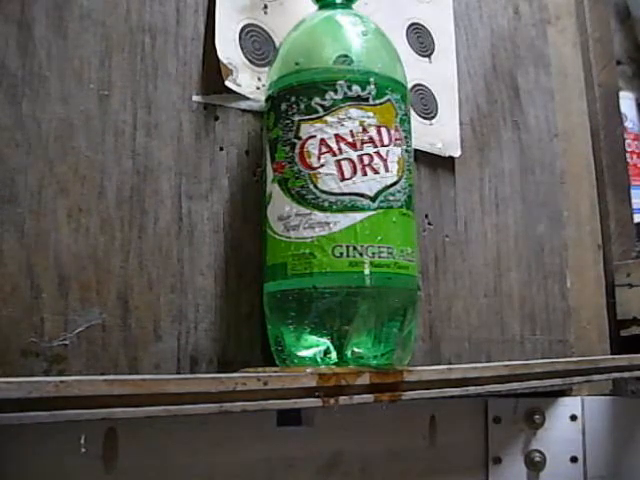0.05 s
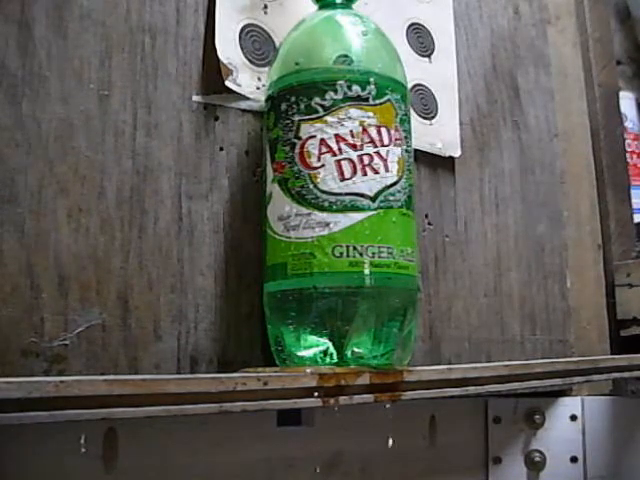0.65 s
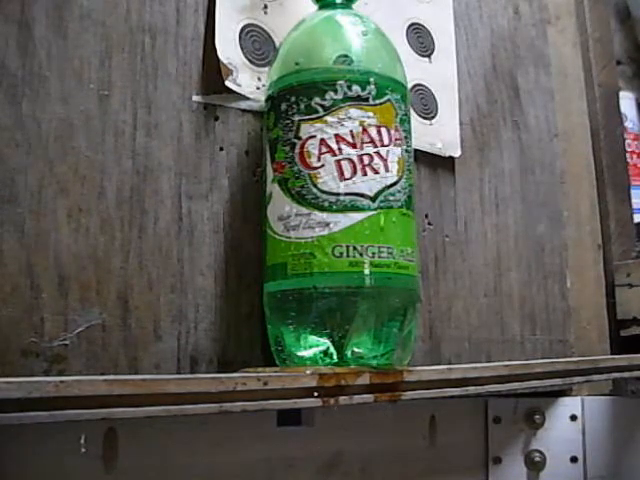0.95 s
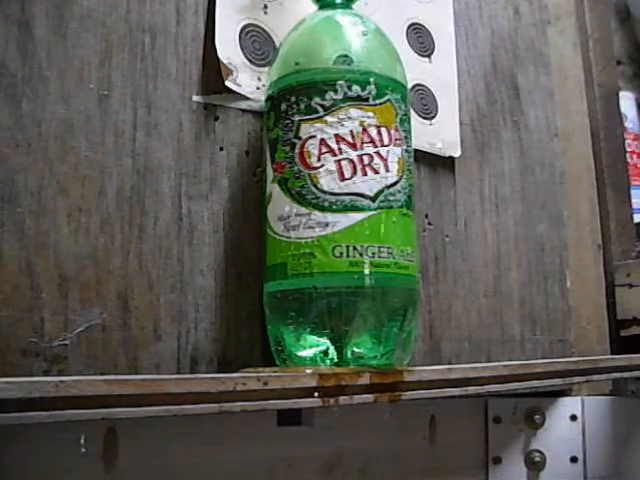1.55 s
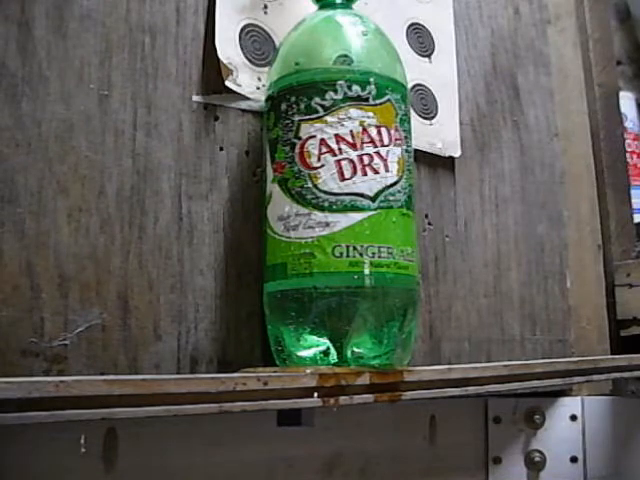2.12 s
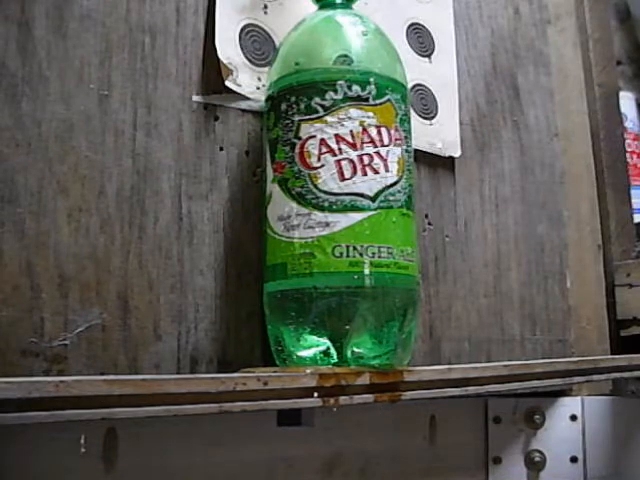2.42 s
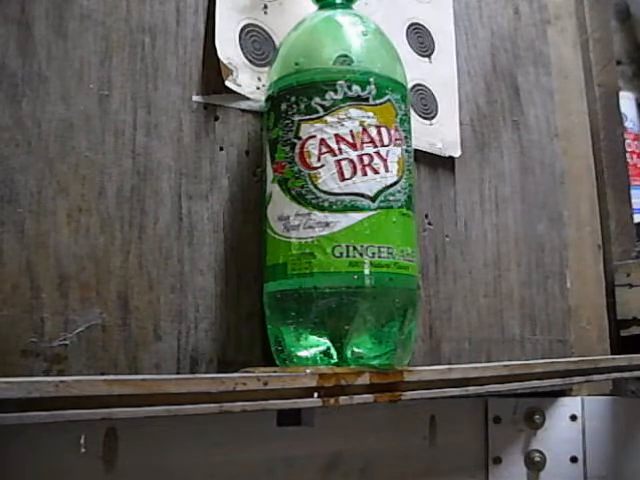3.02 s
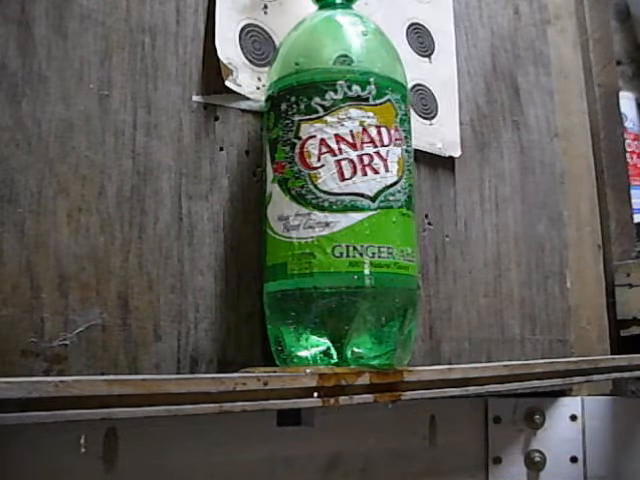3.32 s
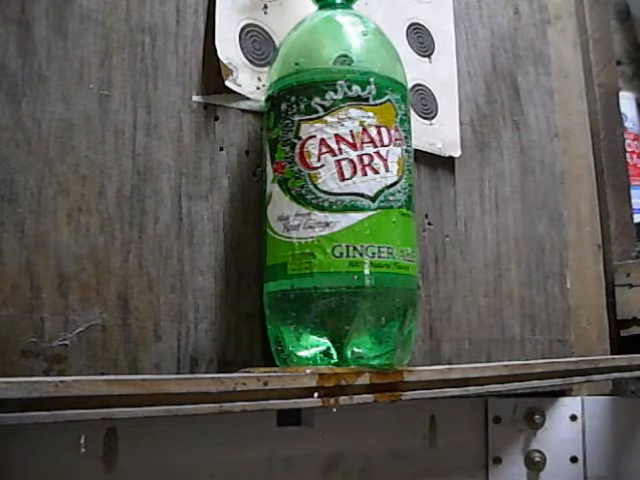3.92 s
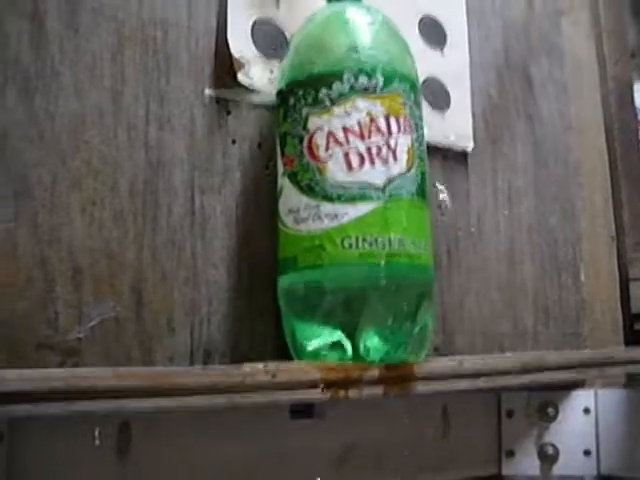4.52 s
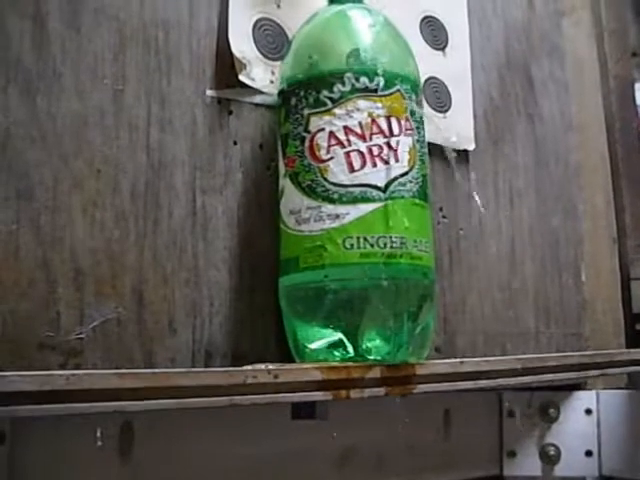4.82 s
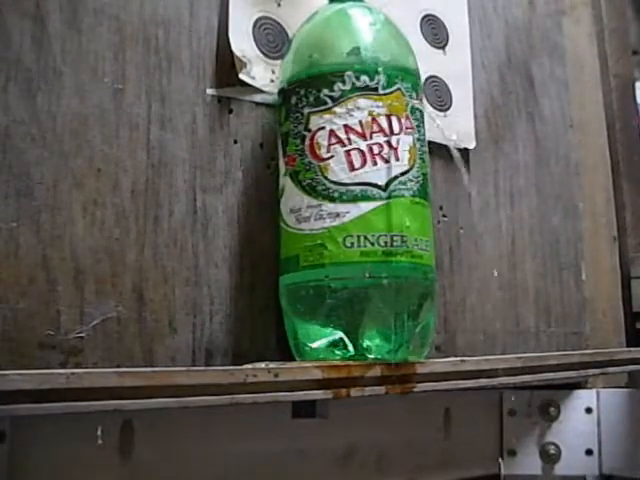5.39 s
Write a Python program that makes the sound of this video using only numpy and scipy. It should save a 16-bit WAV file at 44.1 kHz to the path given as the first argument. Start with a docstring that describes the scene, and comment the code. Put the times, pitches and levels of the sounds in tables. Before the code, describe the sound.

A sleeve brushes, a latch snaps and an air rifle's steel action clacks shut. A quiet wait follows, with irregular hollow drips, a dull bump, light clicks and a distant engine. Then one sharp shot strikes a filled plastic bottle, which knocks and rattles on its wooden shelf over a short low boom. Dripping carries on afterward. It is heard indoors through a small microphone with little treble that distorts at the peak.

```python
"""Air rifle and soda bottle

An air rifle is cocked and fired indoors at a plastic soda bottle that stands against plywood.
Each impact excites the damped modes of the object struck. The shot overloads a small narrow-band
microphone, and the bottle rocks and rattles on its shelf. Soda drips onto something hollow,
a dull bump sounds like a footfall, and an engine pulls through its gears far outside."""
import sys
import numpy as np
from scipy import signal
from scipy.fft import rfft, irfft
from scipy.io import wavfile

SR = 44100
rng = np.random.default_rng(int(sys.argv[2]) if len(sys.argv) > 2 else 0)


def int16_out(signal):
    """Quantize to a 16-bit WAV file."""
    q = np.round(np.clip(np.atleast_2d(signal).T, -1, 1) * 32767)
    wavfile.write(sys.argv[1], SR, q.astype(np.int16))


N = 244887
TIME, AGE = np.arange(N) / SR, np.arange(SR) / SR  # seconds into the scene; seconds after an impact
BASS_HZ, MIDDLE_HZ, TREBLE_HZ = (85, 400), (400, 1050), (1100, 4500)
ROOM_T60_S, ROOM_TREBLE_T60_S = 0.57, 0.33

# Modes of the plywood with the bottle on it. Each row: frequency in Hz, level in dB, T60 in seconds.
BOARD_MODES = [(139.7, 4, 0.52), (175.8, 5, 0.43), (211, 5, 1), (298.3, -1.5, 0.2), (361.4, 5, 0.14),
               (416, 0.5, 0.55), (484, -3.5, 0.27), (527.4, -0.5, 0.27), (664, -6.5, .3), (691, 7.5, 0.18),
               (744, -9, 0.32), (861, 2.5, 0.27), (982, -1, 0.22), (1097, 0.5, 0.22), (1173, -5.5, 0.55),
               (1514, -1, 0.18), (1680, -9, 0.1), (1706, -15.5, 0.4), (2294, -6, 0.35), (2464, 0, 0.15),
               (2690, 7, 0.073), (2786, -8.5, 0.22), (2930, -2.5, 0.17), (3400, -19.5, 0.15)]


def undb(db):
    """Amplitude ratio for a level in decibels."""
    return 10 ** (np.asarray(db) / 20)


def fade(t60):
    """One second of exponential decay, falling 60 dB in t60 seconds."""
    return np.exp(-np.log(1000) * AGE / max(t60, .005))


def band(x, lo_hz, hi_hz):
    """Causal Butterworth band-pass."""
    return signal.sosfilt(signal.butter(3, [lo_hz, hi_hz], "band", fs=SR, output="sos"), x)


def onset_level(x, db):
    """Scale an impact so that its first 20 ms have this rms level."""
    return x * undb(db) / np.std(x[:SR // 50])


def noise(colour, size):
    """Spectral shaping: noise of unit rms whose density follows (Hz, dB) points."""
    hz, db = np.transpose(colour)
    bins_hz = np.maximum(np.fft.rfftfreq(size, 1 / SR), 1)
    gain = undb(np.interp(np.log(bins_hz), np.log(hz), db))
    x = irfft(rfft(rng.standard_normal(size)) * gain, size)
    return x / np.std(x)


def walk(rate_hz):
    """Random modulation: linear interpolation between Gaussian values."""
    knots = rng.standard_normal(int(rate_hz * N / SR) + 2)
    return np.interp(TIME * rate_hz, np.arange(len(knots)), knots)


def add(out, s, x):
    """Superpose x on out at s seconds."""
    i = max(int(s * SR), 0)
    out[i:i + len(x)] += x[:max(N - i, 0)]


def impact(modes, t60, middle_db, bass_db, treble_db,
           wash_db, treble_wash_db, room_db, treble_t60_ratio, bass_lag_s, rise_s):
    """Modal response: a few resolved modes, a noise-like wash of overlapping ones, and reverberation."""
    ring = 0
    for hz, db, mode_t60 in modes:
        envelope = undb(db + rng.standard_normal()) * fade(mode_t60)
        detuning = 1 + 0.002 * rng.standard_normal()
        ring = ring + envelope * np.sin(2 * np.pi * hz * detuning * AGE)
    swell = 1 - np.exp(-AGE / max(rise_s, 1e-4))  # near walls add their echoes within milliseconds

    def register(edges_hz, db, noise_db, band_t60, room_t60):
        """Modes and wash in one band, at db re the middle band; lasting contact damps the modes."""
        decay = fade(band_t60) + undb(room_db) * fade(room_t60)
        wash = onset_level(band(rng.standard_normal(SR) * decay, *edges_hz), noise_db)
        resolved = onset_level(band(ring * fade(4 * band_t60), *edges_hz), 0)
        return onset_level(swell * (resolved + wash), middle_db + db)

    bass = register(BASS_HZ, bass_db, wash_db, t60, ROOM_T60_S)
    middle = register(MIDDLE_HZ, 0, wash_db, t60, ROOM_T60_S)
    treble = register(TREBLE_HZ, treble_db, treble_wash_db, t60 * treble_t60_ratio, ROOM_TREBLE_T60_S)
    return middle + treble + np.pad(bass, (int(bass_lag_s * SR), 0))[:SR]  # heavy parts move late


def impacts(rows, modes, gain_db, **contact):
    """Superposition of the impacts on one object, with gain_db added to each row's level."""
    out = np.zeros(N)
    for s, db, bass_db, treble_db, t60 in rows:
        add(out, s, impact(modes, t60, db + gain_db, bass_db, treble_db, **contact))
    return out


def resonances(rows, room_db):
    """Short contacts each excite one resonance; the narrower its bandwidth, the longer it rings."""
    out = np.zeros(N)
    for s, db, hz, width_hz in rows:
        t60 = 0.15 * np.sqrt(100 / width_hz)
        burst = rng.standard_normal(SR) * (fade(t60) + undb(room_db) * fade(ROOM_TREBLE_T60_S))
        peak = signal.iirpeak(hz, hz / width_hz / 1.57, fs=SR)  # two passes narrow it to width_hz
        ring = signal.lfilter(*peak, signal.lfilter(*peak, burst))
        add(out, s, onset_level(ring, db))
    return out


def room_tone():
    """Ambient noise, strongest in the bass, under a slight amplitude modulation."""
    # The quiet room's spectrum. Each row: frequency in Hz, relative density in dB.
    colour = [(12, -37.5), (20, -2.5), (76, -8), (144, -14.5), (188, -19), (405, -27.5), (462, -29),
              (550, -31), (642, -28.5), (782, -31.5), (1190, -35), (1450, -36), (3800, -39.5), (4940, -64),
              (8360, -120)]
    return noise(colour, N) * undb(-41 + walk(6.91))


def engine(waver_db=2, wander_rad=0.21):
    """Transmission loss: only the two lowest harmonics of a far engine come through the walls."""
    # Rising speed, with a dip at each gear change.
    # Each row: time in seconds, firing rate in Hz, mean level of the second harmonic in dB.
    run = [(.55, 43, -54.5), (1.201, 50.1, -53), (1.7, 55.23, -46.5), (2.25, 52.3, -50.5), (2.8, 56.2, -43),
           (3.2, 61.03, -51.5), (3.55, 63.4, -45), (4.0, 61.5, -56), (4.9, 63, -54), (5.55, 65, -44.5)]
    s, hz, db = np.transpose(run)
    phase = 2 * np.pi * np.cumsum(np.interp(TIME, s, hz)) / SR
    labour_db = 24.5 * np.exp(-((TIME - 2.31) / 0.35) ** 2)  # the fundamental booms after the first change
    out = np.zeros(N)
    for k, harmonic_db in [(1, labour_db - 8.5), (2, 0)]:
        harmonic = np.sqrt(2) * np.sin(k * (phase + wander_rad * walk(9)))
        out += harmonic * undb(np.interp(TIME, s, db) + harmonic_db + waver_db * walk(5.3))
    return out


def footfall():
    """A dull bump, like a step, excites the low modes of the floor."""
    # Each row: start in seconds, middle level in dB, bass and treble in dB re middle, T60 in seconds.
    bumps = [(1.257, -40.5, 15, -28, 0.1), (1.274, -38.5, 11.5, -15, 0.68)]
    # Each row: frequency in Hz, level in dB, T60 in seconds.
    floor_modes = [(86.4, 9, 0.48), (100, 3.5, 0.49), (140.6, 1, 0.52), (180, -1.5, 0.26), (209.4, 3, 0.52),
                   (242, -0.5, 0.22), (335, -8, 0.14), (426, -7, 0.12), (493, -22, 0.16), (654, -22, 0.75),
                   (1370, -26, .1)]
    return impacts(bumps, floor_modes, gain_db=0, wash_db=-9, treble_wash_db=-7, room_db=-13,
                   treble_t60_ratio=1, bass_lag_s=0.0013, rise_s=0.0017)


def spatter(count=110, level_db=-58.5, spread_db=2):
    """Fine spray from the leak: random impulses convolved with one short, noisy impulse response."""
    ticks = np.zeros(N)
    ticks[rng.integers(N, size=count)] = undb(spread_db * rng.standard_normal(count))
    # One tick's spectrum. Each row: frequency in Hz, relative density in dB.
    colour = [(150, -14.5), (210, 6), (450, -1.5), (750, -3), (1400, -35.5), (2800, -14), (4000, -22.5)]
    patter = signal.fftconvolve(ticks, noise(colour, SR) * fade(0.063))[:N]
    return undb(level_db) * patter / np.std(patter)


def drips(small_count=16, t60=0.22, treble_db_per_db=0.3):
    """Drops excite the modes of a hollow surface; the harder the landing, the brighter the tap."""
    # Each row: start in seconds, middle level in dB before the gain, bass in dB re middle.
    large_drops = [(0.554, -37, -9), (0.637, -40.5, 10), (0.67, -29, -11), (0.743, -36, -9),
                   (0.97, -36.5, -0.5), (1.086, -36.5, 8), (1.144, -43, -16), (1.645, -31.5, 0.5),
                   (1.847, -37.5, -2.5), (1.985, -35.5, 4.5), (1.998, -30.5, -13), (2.252, -39, 9.5),
                   (2.356, -38.5, 2), (2.411, -36, -2), (2.624, -37.5, -8), (2.706, -37, 9.5),
                   (2.896, -39, -19), (3.069, -36.5, -4), (3.12, -33, 7), (3.266, -39.5, -1.5),
                   (3.41, -42, -5), (3.599, -40, 0.5), (3.701, -40, 7), (3.79, -38, -4), (4.026, -36, 9),
                   (4.053, -34.5, -12.5), (4.819, -40.5, 15.5), (4.917, -35.5, 10.5), (4.937, -32.5, -9),
                   (4.993, -28.5, 1.5), (5.17, -35, 7), (5.358, -37.5, 8.5), (5.415, -36.5, 6.5)]
    # Each row: frequency in Hz, level in dB, T60 in seconds.
    hollow_modes = [(205.5, 16.5, 0.37), (228, 11, 0.17), (399, -4, 0.49), (666.5, 0, 0.14),
                    (760, -11, 0.27), (942, -14.5, 0.23), (980, -21.5, 0.103), (1583, -13.5, 0.044),
                    (1960, -15.5, 0.02), (2540, -11.5, 0.032), (2820, -13.5, 0.059)]
    small_drops = [((k + when) / small_count * N / SR, -50 + 3 * size, -1)
                   for k, (when, size) in enumerate(rng.random((small_count, 2)))]
    usual_db = np.mean([db for _, db, _ in large_drops])
    rows = [(s, db, bass_db, -9 + treble_db_per_db * (db - usual_db), t60)
            for s, db, bass_db in large_drops + small_drops]
    return impacts(rows, hollow_modes, gain_db=-6.5, wash_db=-8.5, treble_wash_db=-5, room_db=-15.5,
                   treble_t60_ratio=0.61, bass_lag_s=0.0021, rise_s=0.00033)


def sleeve(flutter_db=3, rise_db_per_s=259, fall_db_per_s=109.5):
    """Friction noise: cloth rubs unevenly over the stock; each stroke swells, holds and dies away."""
    # Each row: start and end of the hold in seconds, level in dB.
    strokes = [(0.06, 0.266, -35), (0.886, 1.053, -45)]
    # The cloth's spectrum. Each row: frequency in Hz, relative density in dB.
    colour = [(100, -13.5), (250, 7), (500, -1), (850, -1), (1400, -11), (2200, -17), (3000, -11),
              (4000, -23.5)]
    envelope = np.zeros(N)
    for start, end, db in strokes:
        before_s, after_s = np.maximum(start - TIME, 0), np.maximum(TIME - end, 0)
        envelope += undb(db - rise_db_per_s * before_s - fall_db_per_s * after_s)
    return noise(colour, N) * envelope * undb(flutter_db * walk(97))


def clicks():
    """Light contacts on the rifle excite brief treble resonances."""
    # Each row: start in seconds, level in dB, centre frequency and bandwidth in Hz.
    contacts = [(.068, -38.5, 2400, 110), (.070, -42, 1330, 60), (1.025, -44, 2932, 1500),
                (1.451, -43, 2930, 447), (1.533, -44.5, 2930, 437), (1.615, -48, 3070, 800),
                (1.901, -51, 3500, 900), (4.488, -47.5, 2620, 600), (4.549, -39, 2630, 910),
                (4.725, -43, 3720, 710)]
    return resonances(contacts, room_db=-19.5)


def grip():
    """The wooden stock knocks in its damped modes as it is gripped."""
    # Each row: start in seconds, middle level in dB before the gain, bass and treble in dB re middle,
    # T60 in seconds.
    knocks = [(.022, -45.5, 10.5, -13.5, 0.24), (.076, -33, -2, -0.5, 0.086), (.095, -29, -7, -13.5, 0.097),
              (.101, -21, -1.5, -16, 0.15)]
    # Each row: frequency in Hz, level in dB, T60 in seconds.
    stock_modes = [(217.5, 7.5, 0.22), (336, -1, 0.23), (407, 5, 0.081), (470, -8, 0.063), (738, -9.5, 0.7),
                   (1290, -15, 0.32), (1294, -8.5, .15), (2500, -14.5, .2), (3130, -11, 0.06)]
    return impacts(knocks, stock_modes, gain_db=-1.5, wash_db=-11.5, treble_wash_db=-9, room_db=-10,
                   treble_t60_ratio=0.8, bass_lag_s=0.00074, rise_s=0.0032)


def latch():
    """The steel latch snaps home and rings in free vibration."""
    # One row: start in seconds, middle level in dB before the gain, bass and treble in dB re middle,
    # T60 in seconds.
    snap = [(.269, -28.5, -2.5, 10.5, 0.31)]
    # Each row: frequency in Hz, level in dB, T60 in seconds.
    latch_modes = [(196, -4, 0.51), (728, -16, 0.45), (975, -22.5, 0.98), (1356, -0.5, 0.056),
                   (1520, -10.5, 0.24), (1700, -13, 0.3), (2000, -11.5, 0.23), (2576, -6.5, 0.13),
                   (2650, -7, 0.15), (2780, -10.5, 0.28), (3120, -19.5, 0.1)]
    return impacts(snap, latch_modes, gain_db=-1, wash_db=-4.5, treble_wash_db=-4, room_db=-26,
                   treble_t60_ratio=0.46, bass_lag_s=0.0033, rise_s=0.0015)


def cocking(t60=0.11):
    """Collisions in the steel action excite its modes as the rifle is cocked."""
    # Each row: start in seconds, middle level in dB before the gain, bass and treble in dB re middle.
    clacks = [(0.165, -23, -12, -4.5), (0.173, -16.5, -20, -24), (0.197, -28, -14, -6),
              (0.349, -16.5, -16, 3.5), (0.360, -16, 0.5, 2), (0.3676, -20, 6, 8.5), (0.396, -31, 12.5, 2),
              (0.413, -20.5, -2, -1)]
    # Each row: frequency in Hz, level in dB, T60 in seconds.
    action_modes = [(140, -8.5, .2), (231, 16, 0.62), (333, -4.5, .15), (446, -11, .12), (564, -16, .2),
                    (796, -4.5, 0.2), (902, -1.5, 0.21), (995, -9, 0.067), (1091, 4.5, 0.08),
                    (1237, -4.5, 0.23), (2070, -3.5, .11), (2300, -0.5, 0.16), (2540, -3.5, .18),
                    (3030, 7, 0.077), (3150, -10, .12), (3210, -14.5, 0.076)]
    rows = [(*clack, t60) for clack in clacks]
    return impacts(rows, action_modes, gain_db=-9, wash_db=-1.5, treble_wash_db=0, room_db=-17.5,
                   treble_t60_ratio=1, bass_lag_s=0.0026, rise_s=0.00064)


def shudder(rise_s=0.018):
    """Low-frequency reverberation: heavy blows leave the boards and the room booming."""
    # Each row: start in seconds, level in dB before the envelope, T60 in seconds.
    booms = [(0.358, -23.5, 0.68), (4.105, -12, 0.57), (4.29, -19.5, 1.67)]
    # The boom's spectrum. Each row: frequency in Hz, relative density in dB.
    colour = [(15, -28.5), (36, 7), (53, 6.5), (85, -4.5), (130, -6), (250, -11.5), (600, -46)]
    swell = 1 - np.exp(-AGE / rise_s)
    out = np.zeros(N)
    for s, db, t60 in booms:
        add(out, s, undb(db) * noise(colour, SR) * fade(t60) * swell)
    return out


def bottle_notes():
    """The filled bottle resonates with hollow notes as it is knocked about."""
    # Each row: start in seconds, level in dB, centre frequency and bandwidth in Hz.
    notes = [(4.222, -8, 690, 90), (4.255, -21, 740, 100), (4.375, -32.5, 620, 301), (4.59, -34.5, 730, 79)]
    return resonances(notes, room_db=-31)


def rocking(first_bass_db=13.5, bass_fall_db_per_s=25, t60=0.09):
    """The rocking bottle excites the board's modes; its knocks lose their bass as it settles."""
    # Each row: start in seconds, middle level in dB before the gain, treble in dB re middle.
    knocks = [(4.326, -27.5, -2.5), (4.35, -33.5, 2.5), (4.374, -25, -6), (4.397, -30, -2),
              (4.428, -28.5, -2), (4.455, -30, 0), (4.487, -33, -8.5), (4.557, -23, -8.5), (4.59, -36.5, 8),
              (4.647, -24.5, -5), (4.68, -33, -4), (4.735, -31.5, -5.5)]
    first_s = knocks[0][0]
    rows = [(s, db, first_bass_db - bass_fall_db_per_s * (s - first_s), treble_db, t60)
            for s, db, treble_db in knocks]
    return impacts(rows, BOARD_MODES, gain_db=-11.5, wash_db=-2, treble_wash_db=0, room_db=-5.5,
                   treble_t60_ratio=0.6, bass_lag_s=0.0023, rise_s=0.0015)


def shot(first_t60=0.38, damping_s=0.088):
    """Impulsive excitation of bottle and board; each later blow is more heavily damped."""
    # The trigger's release, the shot, then the pellet's blows.
    # Each row: start in seconds, middle level in dB before the gain, bass and treble in dB re middle.
    blows = [(4.093, -31.5, 8, -6.5), (4.1012, -4, -1, 6.5), (4.109, 1.5, 0.5, -2), (4.140, 2.5, -4, -2),
             (4.178, 3, -2.5, -2), (4.208, -1, 0, -1), (4.2415, -7.5, 0.5, -7.5), (4.257, -15.5, -7, -1)]
    first_s = blows[0][0]
    rows = [(s, *levels, first_t60 * np.exp(-(s - first_s) / damping_s)) for s, *levels in blows]
    return impacts(rows, BOARD_MODES, gain_db=-3.5, wash_db=0.5, treble_wash_db=2, room_db=-27,
                   treble_t60_ratio=0.66, bass_lag_s=0.004365, rise_s=0.00079)


def scene():
    """Superposition of rifle, target and background at one microphone."""
    rifle = cocking() + grip() + latch() + shot() + clicks() + sleeve()
    target = rocking() + bottle_notes() + shudder() + drips() + spatter()
    return (rifle + target + footfall() + room_tone() + engine())[None]


def record(dry, roll_off_hz=3700, mic_hz=3950, top_hz=15300, full_scale=0.5):
    """Overload: the narrow-band input clips; its filter overshoots and clips again, adding high treble."""
    roll_off = signal.butter(6, roll_off_hz, fs=SR, output="sos")
    narrow = signal.ellip(10, .3, 90, mic_hz, fs=SR, output="sos")
    top_cut = signal.ellip(10, .2, 80, top_hz, fs=SR, output="sos")
    band_limited = signal.sosfilt(narrow, signal.sosfilt(roll_off, dry))
    overshooting = signal.sosfiltfilt(narrow, np.clip(band_limited, -full_scale, full_scale))
    clipped = np.clip(1.079 * overshooting, -full_scale, full_scale)
    return signal.sosfilt(top_cut, clipped)


dry = scene()
out = record(dry)
int16_out(out)
```